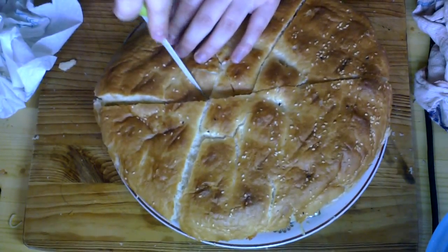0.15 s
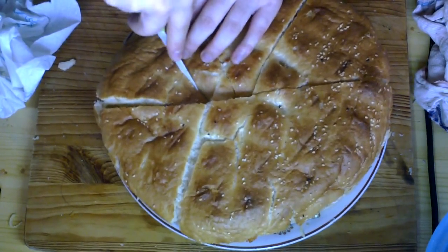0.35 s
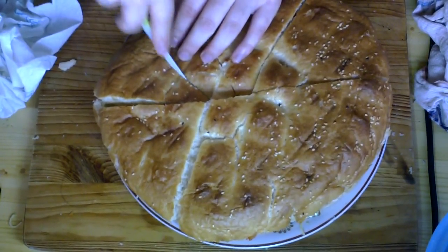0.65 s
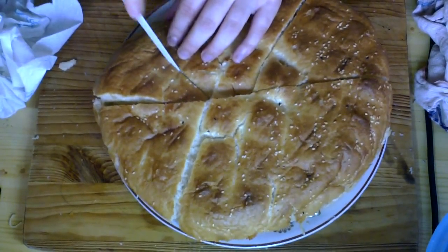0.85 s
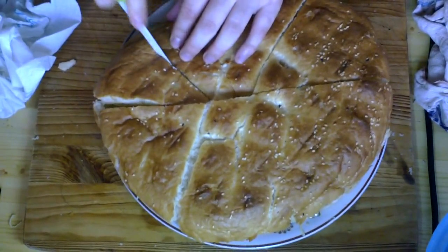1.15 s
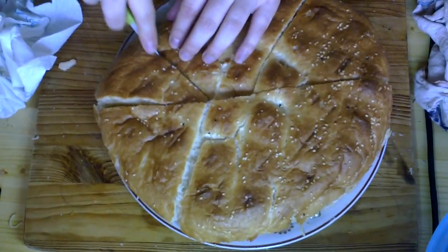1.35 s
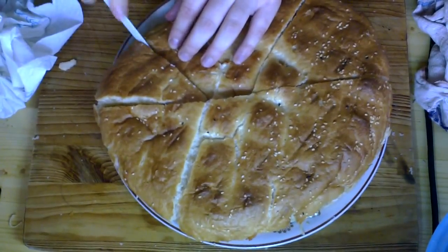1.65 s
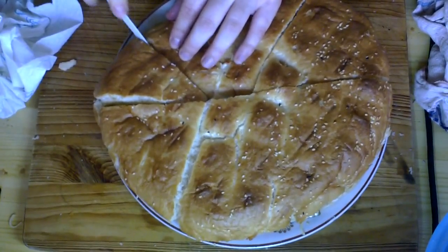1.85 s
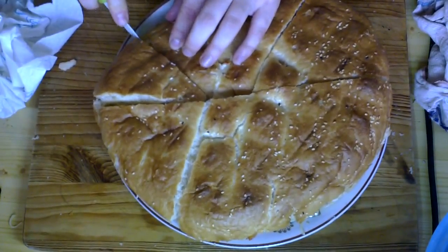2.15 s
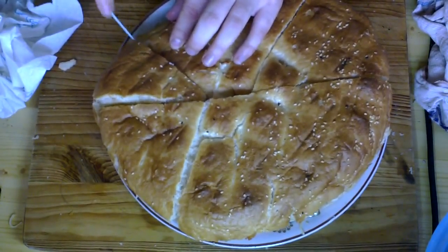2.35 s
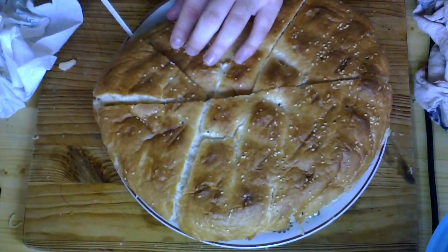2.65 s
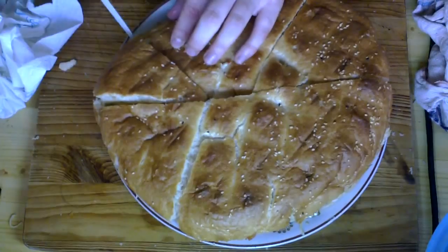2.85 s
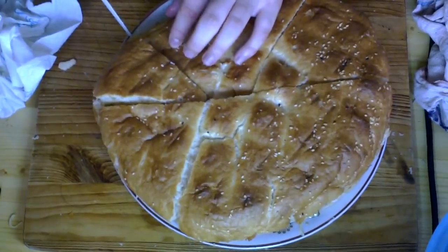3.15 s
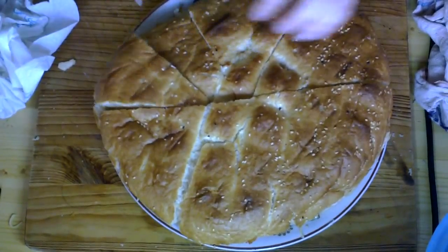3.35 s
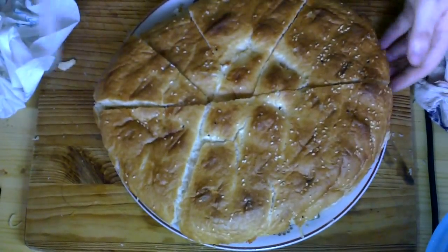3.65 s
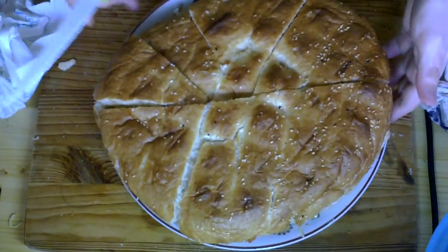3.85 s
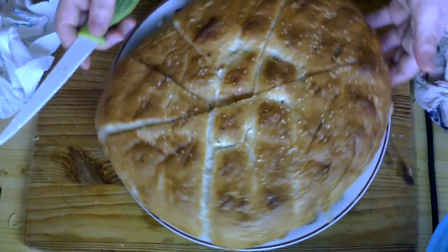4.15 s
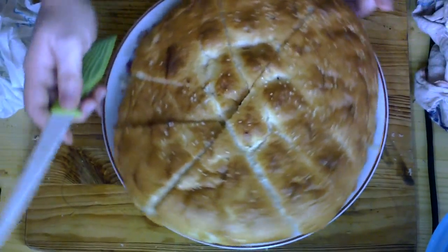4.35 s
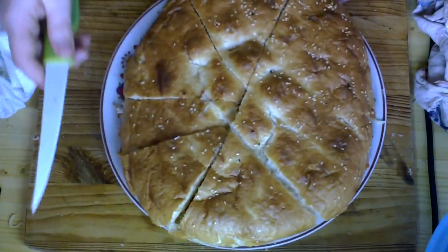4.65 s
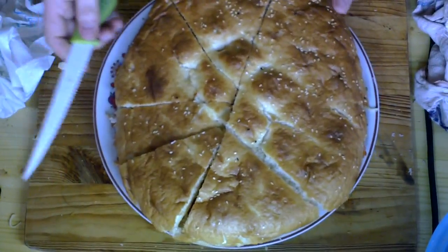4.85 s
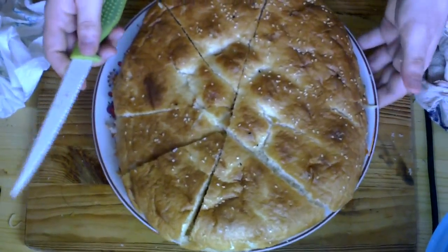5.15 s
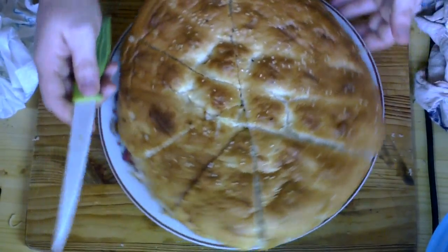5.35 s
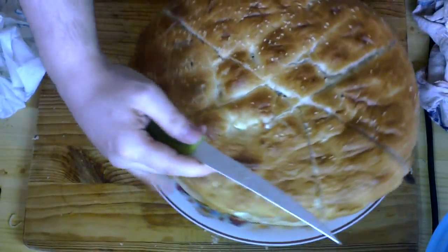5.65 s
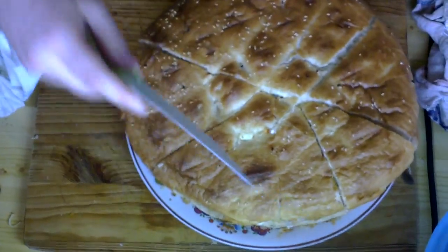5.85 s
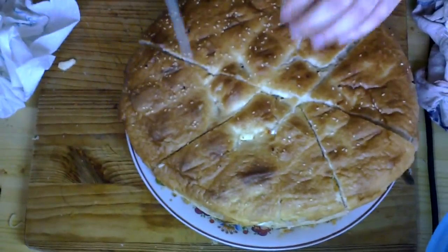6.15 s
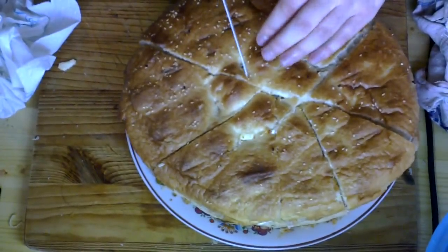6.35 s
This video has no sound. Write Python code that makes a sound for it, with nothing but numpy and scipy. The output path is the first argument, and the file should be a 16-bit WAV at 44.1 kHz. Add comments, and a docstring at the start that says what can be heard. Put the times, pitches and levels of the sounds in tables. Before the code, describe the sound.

Close to a china plate on a wooden table, a serrated knife saws crusty bread in rapid uneven strokes, with crackling crust, sharp flake snaps and dull blade knocks. The strokes weaken, steel scratches the rim faintly, then the plate clunks and scrapes as it is turned twice. A last light stroke follows. Small kitchen, soft hiss, rumble and low hum.

```python
"""A small kitchen, microphone close to a china plate on a wooden table: a serrated knife saws a crusty loaf.
The teeth break the crust in showers of coloured clicks; larger flakes snap, and the blade knocks on the plate.
The plate tips and clunks as ringing noise bursts, then turns and slides as fine slips through its resonances.
A light stroke returns near the end. Table sways, hiss, deep rumble and mains hum lie underneath."""
import sys
import numpy as np
from scipy import signal
from scipy.fft import rfft, irfft
from scipy.io import wavfile

SR = 44100
rng = np.random.default_rng(int(sys.argv[2]) if len(sys.argv) > 2 else 0)


def unload_wav(signal):
    """Save mono or channel-first audio to the path in sys.argv[1] as 16-bit WAV at rate SR, clipped to [-1, 1]."""
    wavfile.write(
        sys.argv[1],
        SR,
        np.round(np.clip(np.atleast_2d(signal).T, -1, 1) * 32767).astype(np.int16),
    )


N = 286648
T = np.arange(N) / SR
RING_T = T[:SR // 2]

# Strokes of the knife, hard pushes and lighter draws back; the three bands get a fixed trim each in sawing().
# Each row: start in seconds, length in seconds, crunch level in dB before trim, swell over the stroke in dB,
# hollow body of the loaf in dB re crunch, crisp top in dB re crunch (both before trim).
STROKES = [(-.02, 0.054, -30.5, -9.5, -5.5, -12), (0.106, 0.14, -48, -4.5, -1.5, -11),
           (0.273, 0.081, -32, 7.5, -5, -14.5), (0.398, 0.18, -50, 17, -5, -20.5),
           (0.554, 0.023, -39, -5.5, 1, -28), (0.614, 0.089, -24, 12.5, -10, -16.5),
           (0.787, 0.12, -42, 13.5, -7.5, -19), (0.938, 0.086, -21, 0.5, -9.5, -15),
           (1.042, 0.21, -45, 8, -7, -19), (1.281, 0.094, -21, 5, -14.5, -14.5),
           (1.458, 0.066, -33.5, -17, -21, -11.5), (1.566, 0.049, -33, -10.5, -15.5, -10.5),
           (1.639, 0.1, -25.5, -6, -15, -10.5), (1.809, 0.039, -38.5, 7.5, -16, -10.5),
           (1.993, 0.11, -32, 1.5, -14.5, -12.5), (2.154, 0.026, -45.5, -1, -8, -10),
           (2.356, 0.091, -46.5, 7.5, -6, -24), (2.552, 0.098, -52.5, 3, -15, -21),
           (2.714, 0.086, -48, -2, -5, -23), (2.819, 0.072, -49.5, -5, -7, -18),
           (3.26, 0.048, -49, -8, -1, -24), (3.316, 0.051, -37.5, -5.5, -14, -15),
           (6.402, 0.082, -53.5, 16, -11, -14)]
# The blade rubbing faintly in the cut between strokes. Each row: time in seconds, crunch level in dB before trim.
IN_CUT = [(0, -67), (1.5, -60), (2.0, -62.5), (2.4, -60), (3.0, -67), (3.45, -66), (3.6, -85)]
# Spectrum of breaking crust. Each row: frequency in Hz, relative density in dB per Hz.
CRUST = [(60, -34.5), (130, -26), (220, -19.5), (450, -16), (750, -11.5), (1200, -13.5), (1700, -5.5),
         (2400, -4), (3200, 1.5), (3900, 3), (4700, -3.5), (6000, -12.5), (9000, -25.5), (15000, -36)]
# The push of each stroke swaying the table. Each row: start in seconds, peak in dB.
TABLE_SWAYS = [(.0, -48), (.33, -49), (.68, -48), (1.02, -47), (1.33, -41), (1.73, -45), (2.04, -42),
               (2.42, -45), (2.80, -44)]
# Spectrum of the hiss. Each row: frequency in Hz, relative density in dB per Hz.
HISS = [(10, -5), (80, 2), (120, -13), (250, -18), (600, -23.5), (1200, -29.5), (2400, -29), (4000, -22),
        (5000, -28), (6500, -35.5), (10000, -36), (15500, -39.5)]
# Spectrum of the deep rumble. Each row: frequency in Hz, relative density in dB per Hz.
RUMBLE = [(5, -18), (15, -0.5), (26, 3.5), (34, -21.5), (60, -24), (100, -28.5), (300, -69.5)]
# Mains hum and its overtones. Each row: frequency in Hz, rms level in dB.
HUM = [(50, -51.5), (150, -73), (250, -77.5), (350, -80.5)]
# Large flakes of crust snapping; cracks() lifts both levels by fixed amounts.
# Each row: start in seconds, level in dB before the lift, crisp top in dB before the lift.
CRACKS = [(0.1214, -23, -14), (0.1342, -21, -8), (0.285, -31, -1.5), (0.3057, -17, -16),
          (0.3369, -13.5, -17), (.575, -17.5, -14), (0.6475, -7.5, -26), (0.6896, -0.5, -40),
          (0.7008, -0.5, -34), (.801, -15, -10.5), (0.8892, -18.5, -13), (.9204, -24, -3),
          (.957, -6.5, -26.5), (1.0223, 1.5, -41), (1.071, -9.5, -34), (1.1795, -24, -11),
          (1.29, -8.5, -22), (1.3089, -7, -27.5), (1.3277, -3, -16), (1.415, -10, -24), (1.5294, -14, -8),
          (1.647, -24, -29), (1.6622, -5, -31), (1.819, -19, -16), (1.8928, -24, -9), (2.0454, -13, -11),
          (2.111, -14.5, -28), (2.1666, -20, -22), (2.478, -29, -28), (2.5003, -19.5, -12.5),
          (2.7708, -16, -33), (2.8348, -13.5, -30), (3.2689, -25, -14), (6.479, -21.5, -28)]
# Blade meeting the plate. Each row: start in seconds, early rms level in dB, contact brightness in Hz.
BLADE_KNOCKS = [(.358, -23, 4300), (.708, -23.5, 3500), (1.014, -30.5, 3020), (1.374, -33.5, 3000),
                (2.428, -45, 5700), (2.769, -39, 6100)]
# Resonances of the plate under the loaf. Each row: frequency in Hz, width in Hz, level in dB.
LOAF_RESONANCES = [(470, 200, -8), (1170, 220, -11), (1410, 180, 0), (1950, 300, -16), (3400, 350, -11),
                   (3800, 200, -7), (4490, 150, -16)]
# Knocks that sound the plate itself, each with a table thud lifted by a fixed amount in plate_knocks(): #
# during the sawing the knife strikes the plate; later the plate tips onto the table. # Each row: start in
# seconds, early rms level of the clack in dB, contact brightness in Hz, # table thud in dB before the lift.
PLATE_KNOCKS = [(2.429, -42.5, 2500, -65), (2.773, -41, 1990, -60), (3.029, -37.5, 1160, -49.5),
                (3.101, -42.5, 215, -47), (3.365, -37.5, 1130, -45.5), (4.0971, -31, 1600, -40.5),
                (4.7225, -31, 1480, -44), (4.944, -49.5, 8000, -70), (5.075, -20, 3550, -31.5),
                (5.778, -15.5, 4200, -29), (5.868, -40.5, 250, -37), (6.476, -50.5, 7000, -67.5)]
# Resonances of the plate on the table. Each row: frequency in Hz, width in Hz, level in dB.
PLATE_RESONANCES = [(228.7, 22, -6), (419, 48, 3.5), (675, 140, -0.5), (818, 140, 3.5), (1172, 270, 1.5),
                    (1472, 90, -1), (1900, 350, 2), (2276, 100, -7), (2570, 165.5, 0.5), (2940, 200, 2),
                    (3400, 130, 5), (3700, 90, 1.5), (4200, 140, -3)]
# Spectrum that plate contact excites. Each row: frequency in Hz, relative density in dB per Hz.
CLACK = [(100, -1.5), (300, -0.5), (500, -5.5), (850, -2), (1900, -2.5), (3400, -2), (4200, -6),
         (5000, -13), (6500, -27), (9000, -39), (15000, -40.5)]
# Modes of the table top. Each row: frequency in Hz, relative level in dB, time to fall 60 dB in seconds.
TABLE_MODES = [(18.6, -8.5, 0.63), (35.3, -19.5, 0.15), (63.5, -2, 0.11), (93.1, -2.5, 0.31),
               (127, -7.5, 0.14), (169, -12.5, 0.18)]
# Blade tip touching the plate's rim as it is drawn out. Each row: start in seconds, early rms level in dB.
TINKS = [(3.006, -41.5), (3.028, -44.5), (3.143, -44.5)]
# Resonances of the free blade. Each row: frequency in Hz, width in Hz, level in dB.
TINK_RESONANCES = [(910, 75, 8), (1452, 55, 7), (1927, 70, 8), (2620, 94, 3.5), (3440, 110, 6.5),
                   (3630, 75, -6), (4040, 73, 11), (5800, 120, -11), (6020, 130, -15), (6400, 100, -12),
                   (8050, 99, -18), (9270, 110, -38), (10250, 140, -39)]
# Turns of the plate on the table. Each row: start in seconds, length in seconds, level at full speed in dB.
SLIDES = [(4.068, 0.5, -45), (4.775, 0.14, -52), (5.158, .73, -43)]
# Spectrum of the plate rubbing on wood. Each row: frequency in Hz, relative density in dB per Hz.
SCRAPE = [(60, -43.5), (130, -17), (240, -2.5), (450, -7), (700, -4.5), (1150, -2.5), (1600, -5.5),
          (2400, -7), (3100, -7), (4000, -6.5), (5000, -11), (6000, -22.5), (7500, -30.5), (14000, -44.5)]
# Resonances of the sliding plate. Each row: frequency in Hz, width in Hz, level in dB.
RUB_RESONANCES = [(1090, 200, -3.5), (3100, 184, -2), (3830, 400, 0)]
# Small things ticking on the shaken table. Each row: start in seconds, peak in dB.
RATTLES = [(5.117, -39), (5.132, -44), (5.165, -38.5), (5.84, -38), (5.846, -49), (5.868, -33),
           (5.879, -35.5)]

# the teeth grip quickly, the blade stops, and loosened crumbs go on crackling for a moment
GRIP_S, STOP_DB_PER_S = .024, 351
SETTLE_DB, SETTLE_DB_PER_S = -14.5, 99
# body and top of the faint rubbing in the cut, re its crunch, before trim
IN_CUT_BODY_DB, IN_CUT_CRISP_DB = -6.5, -19.5
# how far the crunch wavers between dull and bright (rms)
COLOUR_DRIFT_DB = 2.5
# a large flake snaps cleanly; the smaller it is, the more of its sound is splinters
SPLINTER_DB, SPLINTER_DB_PER_DB = -14.5, 0.64
# loudness and brightness of the rubbing: powers of the speed and of the relative loudness
RUB_LOUDNESS_POWER, RUB_BRIGHTNESS_POWER = 1.09, 0.26
TOP_HZ = 15700  # upper edge of the recorder's band


def amp(db):
    """Decibels to gain."""
    return 10 ** (np.asarray(db) / 20)


def unit(x):
    """Scale to rms 1."""
    return x / np.sqrt(np.mean(x ** 2))


def blow(x):
    """Scale a struck sound to rms 1 over its first fiftieth of a second."""
    return x / np.sqrt(np.mean(x[:SR // 50] ** 2))


def cut(x, hz, kind, order=2):
    """Low-, high- or band-pass."""
    hz = np.minimum(hz, SR / 2 - 1)
    return signal.sosfilt(signal.butter(order, hz, kind, fs=SR, output="sos"), x)


def colour(x, points, size=2048):
    """Causal filter of unit energy with the given (Hz, dB) spectrum, made minimum-phase by its cepstrum."""
    hz, db = np.transpose(points)
    bins = np.maximum(np.arange(size // 2 + 1) * SR / size, 1)
    spectrum = amp(np.interp(np.log(bins), np.log(hz), db))
    cepstrum = irfft(np.log(spectrum))
    cepstrum[1:size // 2] *= 2
    cepstrum[size // 2 + 1:] = 0
    response = irfft(np.exp(rfft(cepstrum)))
    return signal.fftconvolve(x, response / np.linalg.norm(response))[:len(x)]


def resonate(x, resonances):
    """Resonances side by side, each a peak filter of the given width."""
    out = np.zeros(len(x))
    for hz, width, db in resonances:
        b, a = signal.iirpeak(hz, hz / width, fs=SR)
        out += amp(db) * signal.lfilter(b, a, x)
    return out


def fade(t60):
    """Exponential decay, 60 dB in t60 seconds."""
    return np.exp(-np.log(1000) * RING_T / t60)


def burst(t60):
    """Decaying noise of unit energy: many modes too close to tell apart."""
    x = rng.standard_normal(len(RING_T)) * fade(t60)
    return x / np.linalg.norm(x)


def ring(modes):
    """Decaying sines of a struck body, of alternating sign."""
    out = np.zeros(len(RING_T))
    for k, (hz, db, t60) in enumerate(modes):
        out += (-1) ** k * amp(db) * fade(t60) * np.sin(2 * np.pi * hz * RING_T)
    return out


def add(out, s, x):
    """Mix x into out from time s in seconds."""
    i = max(int(s * SR), 0)
    out[i:i + len(x)] += x[:N - i]


def wander(hz):
    """Low-passed noise of rms 1: a random drift with movements up to about hz."""
    return unit(cut(rng.standard_normal(N), hz, "low"))


def grains(per_s, spread_db, even_s):
    """Random clicks of unequal size, their power evened out over even_s seconds."""
    present = rng.random(N) < per_s / SR
    clicks = present * rng.choice([-1, 1], N) * amp(spread_db * rng.standard_normal(N))
    window = signal.windows.hann(int(even_s * SR))
    power = signal.fftconvolve(clicks ** 2, window / window.sum(), "same")
    return clicks / np.sqrt(np.abs(power) + 1e-9)


def stroke(start, length, swell_db):
    """Gain of one stroke: the teeth grip, the pressure swells or eases, the blade stops and the crumbs settle."""
    t = T - start
    after = np.maximum(t - length, 0)
    grip = np.clip(t / GRIP_S, 0, 1)
    pressure = amp(swell_db * (np.clip(t / length, 0, 1) - .5))
    release_db = np.maximum(-STOP_DB_PER_S * after, SETTLE_DB - SETTLE_DB_PER_S * after)
    return grip * pressure * amp(release_db)


def flakes(clicks, count=8):
    """Each click breaks one of several kinds of flake, each with a brief ring of its own."""
    kind = rng.integers(0, count, N)
    out = np.zeros(N)
    for k in range(count):
        flake_ring = burst(t60=0.0055)[:512]
        out += signal.oaconvolve(clicks * (kind == k), flake_ring)[:N]
    return out


def sawing():
    """The teeth tear the crust; a deep cut sounds the loaf's body, dry surface crust adds the crisp top."""
    resting = amp(np.interp(T, *np.transpose(IN_CUT), right=-120))
    power = np.outer(amp([IN_CUT_BODY_DB, 0, IN_CUT_CRISP_DB]), resting) ** 2
    for start, length, db, swell_db, body_db, crisp_db in STROKES:
        band_gains = amp([db + body_db, db, db + crisp_db])
        power += np.outer(band_gains ** 2, stroke(start, length, swell_db) ** 2)
    # the teeth catch and let go unevenly, so the flakes break in clusters
    bite = amp(2.5 * unit(cut(rng.standard_normal(N), [50, 220], "band")))
    # the crumb rubs softly between the breaking flakes
    crumb = amp(-11) * rng.standard_normal(N)
    breaking = flakes(grains(per_s=1700, spread_db=1.5, even_s=.04))
    crackle = colour(bite * (breaking + crumb), CRUST)
    body = amp(-2.0) * unit(cut(cut(crackle, 130, "high"), 1203, "low", order=3))
    # coarse and fine crust alternate along the cut, so the crunch drifts duller and brighter
    coarse = cut(crackle, 3600, "low", order=1)
    fine = crackle - coarse
    drift = amp(COLOUR_DRIFT_DB * wander(20))
    mixed = coarse / drift + fine * drift
    crunch = amp(-3.5) * unit(cut(mixed, [1300, 7500], "band", order=3))
    crisp = amp(-4.5) * unit(cut(crackle, 8450, "high", order=4))
    return np.sum(np.sqrt(power) * [body, crunch, crisp], axis=0)


def table_sways():
    """After each push the table top rumbles around a 93 Hz drum note that swells up gradually."""
    out = np.zeros(N)
    for s, db in TABLE_SWAYS:
        push = 3 * (RING_T == 0) + burst(t60=.4)
        drum = signal.fftconvolve(push, ring([(93, 0, .45)]))[:len(RING_T)]
        drum = drum * (1 - np.exp(-(RING_T / .06) ** 2))
        add(out, s, amp(db) * drum / np.abs(drum).max())
    return out


def background():
    """Microphone hiss and a deep rumble are coloured noise; mains hum is steady sines."""
    hiss = amp(-59.0) * colour(rng.standard_normal(N), HISS)
    rumble = amp(-50) * colour(rng.standard_normal(N), RUMBLE, size=16384)
    hum = np.zeros(N)
    for hz, db in HUM:
        hum += amp(db) * np.sqrt(2) * np.sin(2 * np.pi * (hz * T + rng.random()))
    return hiss + rumble + hum


def cracks():
    """A flake snaps with one sharp click and a short spray of splinters."""
    out = np.zeros(N)
    for s, db, crisp_db in CRACKS:
        spray = burst(t60=0.0047) + 1.2 * burst(t60=0.055)
        splinters = amp(SPLINTER_DB - SPLINTER_DB_PER_DB * db) * spray
        snap = colour((RING_T == 0) + splinters, CRUST)
        snap = snap + amp(crisp_db + 18) * cut(snap, 7500, "high")
        add(out, s, amp(db + 5.5) * snap / np.linalg.norm(snap))
    return out


def blade_knocks():
    """The blade comes through the loaf and judders on the plate, which the bread damps."""
    out = np.zeros(N)
    for s, db, hz in BLADE_KNOCKS:
        judder = .35 * (RING_T == 0) + burst(t60=.04) + .6 * burst(t60=.14)
        knock = cut(resonate(judder, LOAF_RESONANCES), hz, "low")
        add(out, s, amp(db) * blow(knock))
    return out


def plate_knocks():
    """The plate is struck, by the knife or by tipping onto the wood: softer contact is duller, and the table
    top swings up late."""
    out = np.zeros(N)
    thud = ring(TABLE_MODES) * (1 - np.exp(-(RING_T / 0.016) ** 2))
    for s, db, hz, thud_db in PLATE_KNOCKS:
        # the blow, the chatter of the contact, and the room's answer
        strike = 0.11 * (RING_T == 0) + 0.5 * burst(t60=0.019)
        contact = strike + burst(t60=0.2) + .22 * burst(t60=0.38)
        plate = resonate(contact, PLATE_RESONANCES)
        clack = colour(plate + amp(-14.0) * contact + amp(-25.5) * strike, CLACK)
        add(out, s, amp(db) * blow(cut(clack, hz, "low")))
        add(out, s + .003, amp(thud_db + 12.5) * thud / np.abs(thud).max())
    return out


def tinks():
    """Free of the bread, the steel scratches the rim and rings thinly and roughly."""
    out = np.zeros(N)
    for s, db in TINKS:
        scratch = .5 * (RING_T == 0) + 0.25 * burst(t60=0.012) + burst(t60=0.25)
        tink = resonate(scratch, TINK_RESONANCES) + amp(-15.0) * colour(scratch, CRUST)
        add(out, s, amp(db) * blow(tink))
    return out


def turn(start, length):
    """Speed of one turn of the plate, 0-1: it gathers pace and slows again."""
    return np.abs(np.sin(np.pi * np.clip((T - start) / length, 0, 1)))


def sliding():
    """The plate's foot rubs over the wood in fine slips that sound the plate; faster is louder and brighter."""
    gain = np.zeros(N)
    for start, length, db in SLIDES:
        gain += amp(db) * turn(start, length) ** RUB_LOUDNESS_POWER
    slips = colour(grains(per_s=7500, spread_db=2.5, even_s=0.12), SCRAPE)
    # as the plate turns, the contact moves and each resonance swells and fades on its own
    ringing = sum(amp(3 * wander(5)) * resonate(slips, [row]) for row in RUB_RESONANCES)
    rub = unit(slips + ringing)
    dull = cut(rub, 2200, "low", order=1)
    brightness = (gain / gain.max()) ** RUB_BRIGHTNESS_POWER
    unsteadiness = amp(wander(25))
    return gain * unsteadiness * (dull + brightness * (rub - dull))


def rattles():
    """Light, high ticks while the table still shakes: very short band-passed bursts."""
    out = np.zeros(N)
    for s, db in RATTLES:
        tick = cut(burst(t60=0.0023), [4000, 6500], "band", order=3)
        add(out, s, amp(db) * tick / np.abs(tick).max())
    return out


def kitchen(x):
    """The table and near things reflect at once; close walls add a short reverberation whose treble dies first."""
    response = np.zeros(N)
    add(response, .001, amp(-6) * burst(t60=0.025))
    add(response, .005, amp(-4) * cut(burst(t60=0.26), 2600, "low"))
    add(response, .003, amp(-13) * cut(burst(t60=.14), 6000, "high"))
    return x + signal.fftconvolve(x, response[:SR])[:N]


def scene():
    """Cutting, then turning the plate, in one small kitchen; plate knocks carry their own room tail."""
    near = sawing() + cracks() + blade_knocks() + tinks() + sliding() + rattles()
    return (kitchen(near) + plate_knocks() + table_sways() + background())[None]


def record(dry):
    """The recorder rounds the loudest peaks and cuts the top."""
    rounded = dry / (1 + (dry / .7) ** 4) ** (1 / 4)
    return signal.sosfilt(signal.ellip(10, .2, 70, TOP_HZ, fs=SR, output="sos"), rounded)


dry = scene()
out = record(dry)
unload_wav(out)
```